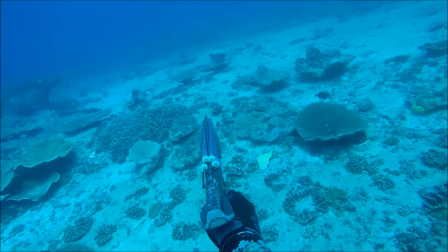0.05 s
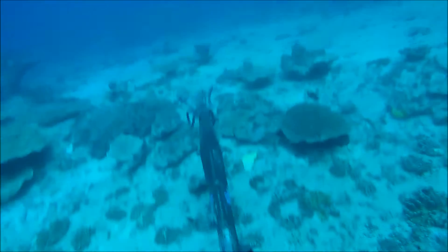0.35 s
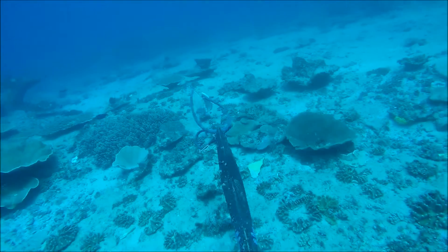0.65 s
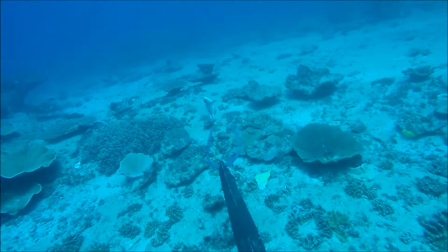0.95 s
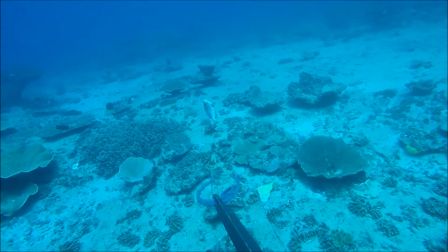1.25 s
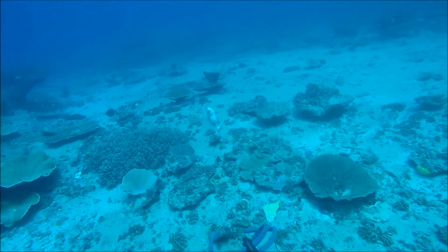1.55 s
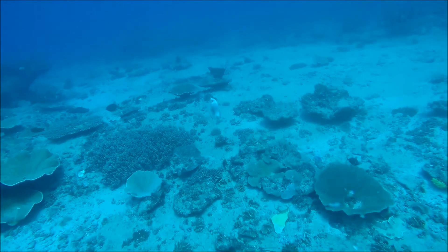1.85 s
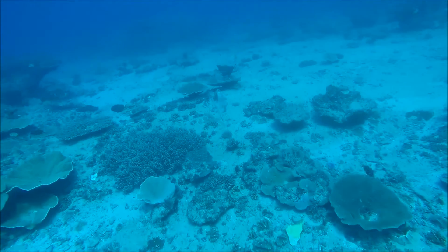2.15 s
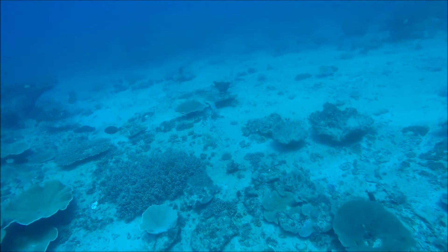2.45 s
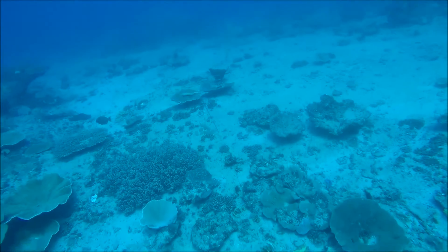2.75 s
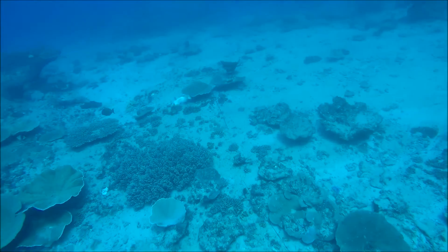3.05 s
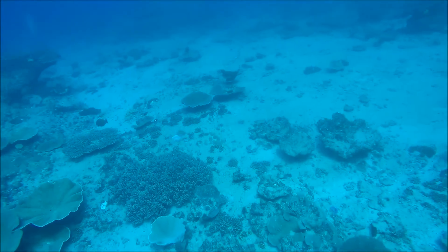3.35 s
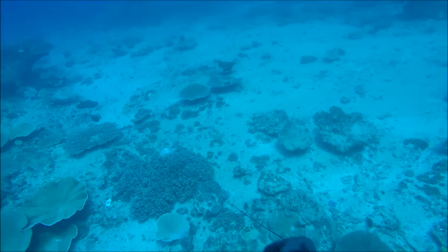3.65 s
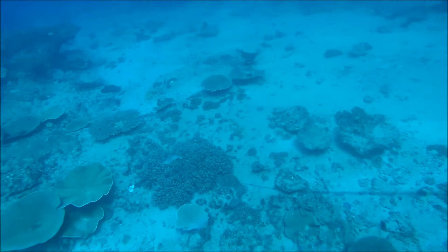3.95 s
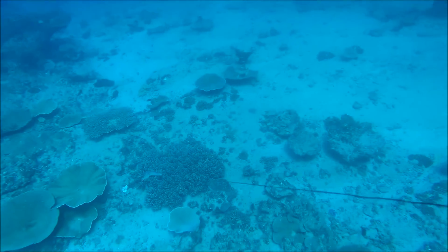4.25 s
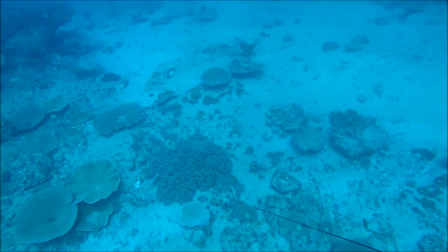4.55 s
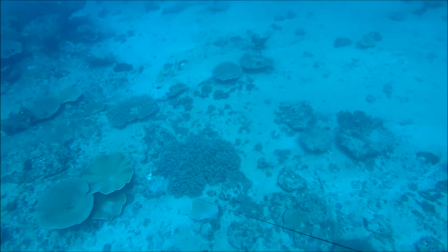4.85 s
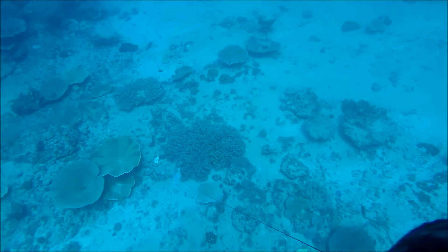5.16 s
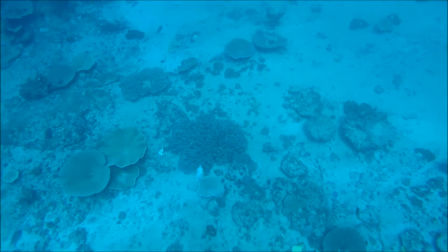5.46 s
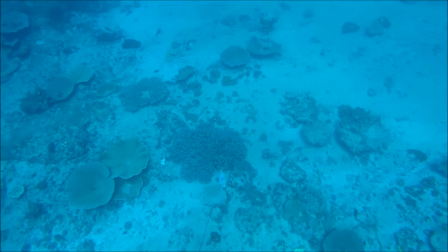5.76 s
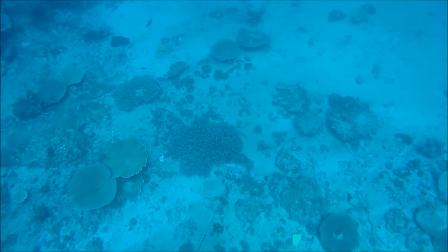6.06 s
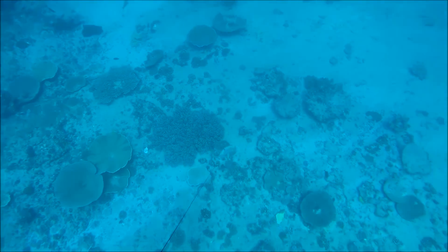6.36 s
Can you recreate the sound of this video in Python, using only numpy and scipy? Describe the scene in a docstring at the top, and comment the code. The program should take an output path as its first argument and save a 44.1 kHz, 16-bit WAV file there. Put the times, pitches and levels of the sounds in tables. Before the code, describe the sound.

A speargun snaps loudly underwater, followed by small clicks and knocks over a low current and a swell of bubbly fizz.

```python
"""Speargun over a coral reef.

Underwater, close to the gun, with the microphone inside a waterproof camera housing. The trigger lets
go, the shaft scrapes out along the barrel, the recoil shoves the water and the line snaps taut. Gear
ticks and knocks over crackling shrimp and a low current, until a fizzing rush of water swells up."""
import sys
import numpy as np
from scipy import signal
from scipy.fft import rfft, irfft
from scipy.io import wavfile
from scipy.ndimage import uniform_filter1d

SR = 44100
rng = np.random.default_rng(int(sys.argv[2]) if len(sys.argv) > 2 else 0)


def transcribe(signal):
    """Save signal, clipped to [-1, 1], as a 16-bit WAV file at the path in sys.argv[1]."""
    frames = np.atleast_2d(signal).T
    limited = np.clip(frames, -1, 1)
    pcm = np.round(limited * 32767).astype(np.int16)
    wavfile.write(sys.argv[1], SR, pcm)


N = 287091
T = np.arange(N) / SR
BRIEF = T[:SR // 2]


def undb(db):
    """Decibels to gain."""
    return 10 ** (np.asarray(db) / 20)


def unit(x):
    """Scale to rms 1."""
    return x / np.std(x)


def peak(x, db):
    """Scale to a peak level."""
    return x * undb(db) / np.max(np.abs(x))


def add(out, s, x):
    """Mix a short sound in at time s."""
    start = int(s * SR)
    out[start:start + len(x)] += x[:N - start]


def band(x, hz, kind, order=4):
    """Low-, high- or band-pass."""
    return signal.sosfilt(signal.butter(order, hz, kind, fs=SR, output="sos"), x)


def resonance(x, hz, width_hz):
    """One resonant peak."""
    return signal.lfilter(*signal.iirpeak(hz, hz / width_hz, SR), x)


def colour(x, points, size=4096):
    """Minimum-phase filter through (Hz, dB) points, falling away beyond both ends."""
    hz, db = np.transpose(sorted(points))
    octave = np.log2(np.maximum(np.arange(size // 2 + 1) * SR / size, 1))
    outside = np.abs(octave - np.clip(octave, np.log2(hz[0]), np.log2(hz[-1])))
    gain = undb(np.interp(octave, np.log2(hz), db) - 20 * outside)
    cepstrum = irfft(np.log(gain))
    cepstrum[1:size // 2] *= 2
    cepstrum[size // 2 + 1:] = 0
    return signal.fftconvolve(x, irfft(np.exp(rfft(cepstrum))))[:len(x)]


def walk(rate):
    """Smooth random drift with a spread of 1, turning `rate` times a second."""
    hold = int(SR / rate)
    steps = np.repeat(rng.standard_normal(N // hold + 1), hold)
    return unit(uniform_filter1d(steps, hold)[:N])


def grains(rate, spread_db):
    """Random clicks of unequal size, about `rate` a second."""
    size = undb(spread_db * np.minimum(rng.standard_normal(N), 2.5))
    return (rng.random(N) < rate / SR) * size * rng.choice([-1, 1], N)


def impulse(t, chatter, decay_s):
    """One sharp push with a dying tail of noise."""
    push = chatter * rng.standard_normal(len(t)) * np.exp(-t / decay_s)
    push[0] += 1
    return push


def swells(table, steady_db=-200):
    """Gain of smooth swells that rise out of a steady level and sink back."""
    power = sum((undb(db) * np.exp(-((T - s) / half_s) ** 2)) ** 2 for s, db, half_s in table)
    return np.sqrt(undb(steady_db) ** 2 + power)


def fade(s, db_per_s):
    """Gain that holds at 1 until time s, then dies away."""
    return undb(-db_per_s * np.maximum(T - s, 0))


def swings(table, rise_s):
    """Damped oscillations that take a moment to build."""
    out = np.zeros(N)
    for s, db, hz, t60 in table:
        envelope = (1 - np.exp(-(BRIEF / rise_s) ** 2)) * np.exp(-np.log(1000) * BRIEF / t60)
        add(out, s, peak(-np.sin(2 * np.pi * hz * BRIEF) * envelope, db))
    return out


def reef(level_db=-48):
    """Countless far shrimp merge into a hiss; nearer ones crackle."""
    # the reef heard through the housing: (frequency [Hz], gain [dB])
    reef_colour = [(1150, -24), (1900, -16), (2450, 0.5), (2780, 1.5), (3000, -13), (3250, -5.5),
                   (3950, -7.5), (4850, 0.5), (5500, -15), (6400, -16), (7250, -8.5), (8800, -20.5),
                   (10800, -18.5), (14000, -27.5)]
    far = undb(0.5) * unit(grains(rate=9000, spread_db=4.5))
    near = undb(-5) * unit(grains(rate=450, spread_db=8.5))
    return unit(colour(far + near, reef_colour)) * undb(level_db + 0.054 * walk(rate=5.5))


def current(start_db=-44.5, rise_db_per_s=0.79, waver_db=2):
    """Eddies and a current buffet the housing; the current grows slowly as the diver moves off."""
    # passing eddies: (time [s], level [dB], half length [s])
    eddies = [(.27, -35.5, 0.032), (.48, -39.5, 0.066), (.94, -38, 0.035), (2.29, -35, .1),
              (3.02, -33, .06), (3.18, -33, 0.096), (4.15, -43, 0.27), (4.65, -36.5, 0.13),
              (5.0, -37, 0.086)]
    # rumble of water on the housing: (frequency [Hz], gain [dB])
    flow_colour = [(18, 7), (32, 2), (55, -3.5), (80, -9.5), (110, -20), (170, -24), (260, -29.5),
                   (400, -48.5)]
    level = swells(eddies, start_db + rise_db_per_s * T) * undb(waver_db * walk(rate=10))
    return unit(colour(rng.standard_normal(N), flow_colour)) * level


def knock(db, hz):
    """A soft contact: a few cycles around one pitch, with no treble."""
    # dull body of a knock: (frequency [Hz], gain [dB])
    knock_colour = [(150, -16), (330, 3.5), (480, 0), (590, -3.5), (750, 0.5), (1050, -4), (1400, -26),
                    (2500, -11)]
    push = impulse(BRIEF, chatter=0.069, decay_s=0.0052)
    return peak(resonance(colour(push, knock_colour), hz, 0.43 * hz), db)


def knocks(gain_db=1, taps_per_s=5, tap_db=-44.5, tap_spread_db=2, tap_hz=382):
    """The gun and its rubber bands knock; the slack bands tap faintly at uneven gaps in between."""
    # distinct knocks: (time [s], peak before gain [dB], pitch [Hz])
    bumps = [(0.272, -14, 496), (.633, -41, 358), (.681, -43, 370), (1.505, -42.5, 355),
             (1.626, -43.5, 366), (1.763, -47, 463), (1.84, -41.5, 366), (2.197, -40.5, 364),
             (2.474, -42, 374), (2.516, -40, 1090), (2.596, -39.5, 850), (2.659, -36, 750),
             (2.683, -34, 865), (2.836, -43, 380), (2.927, -37.5, 503), (3.106, -43, 390), (3.23, -22, 750),
             (3.701, -43, 378), (4.045, -44, 412), (4.069, -39.5, 369), (4.086, -44, 387),
             (4.175, -41, 334), (4.336, -37, 396), (4.668, -35.5, 398), (4.862, -43, 436)]
    out = np.zeros(N)
    for s, db, hz in bumps:
        add(out, s + 0.00084, knock(db + gain_db, hz))
    for k, (delay, strength) in enumerate(rng.random((64, 2))):
        s = (k + delay) / taps_per_s
        if s < T[-1]:
            add(out, s, knock(tap_db + tap_spread_db * (2 * strength - 1), tap_hz))
    return out


def contact(ring_db, edge_db, decay_s, centre_hz, width_hz, chatter, split_hz=3600):
    """A blow rings the housing; its ring and its bright edge each have their own level."""
    # modes of the housing: (frequency [Hz], width [Hz], gain [dB])
    modes = [(1270, 960, -16), (1690, 420, -11.5), (2090, 120, -8.5), (2389, 154, -1), (2745, 90, 1),
             (3150, 210, -10), (4730, 330, -2), (5120, 750, -8.5), (7170, 360, -8.5), (8200, 440, -16),
             (9440, 230, -18.5), (12100, 640, -26.5)]
    push = impulse(BRIEF[:SR // 10], chatter, decay_s)
    ring = sum((-1) ** k * undb(db) * resonance(push, hz, width)
               for k, (hz, width, db) in enumerate(modes))
    body = resonance(band(ring, split_hz, "low"), centre_hz, width_hz)
    return peak(body, ring_db) + peak(band(ring, split_hz, "high"), edge_db)


def speargun(release_s=0.2767, rise_s=0.03, clear_s=0.3265, taut_s=0.432):
    """The shaft sticks and slips until it clears the muzzle; the line runs out and shivers once taut."""
    # blows of trigger, shaft on barrel and line snapping taut:
    # (time [s], ring [dB], bright edge [dB], contact decay [s], centre [Hz])
    blows = [(0.2713, -13, -15, 0.0012, 2670), (0.2741, 4.5, -1.5, 0.0017, 2740),
             (0.2761, -5.5, -24, 0.0038, 2160), (.2957, -10, -9, 0.0044, 2680),
             (0.3154, -30, 0, 0.00087, 2670), (0.3255, -18, -1, 0.0015, 2670),
             (.3358, -23, -10.5, 0.0012, 2300), (.3564, -15, -23, 0.003, 2020),
             (0.3774, -19, -33, 0.0053, 1650), (0.401, -28, -51, 0.0029, 1500),
             (0.4272, -20, -31, 0.0009, 2670), (0.4313, -5.5, -16, 0.0017, 2750),
             (.4376, -23, -18, 0.00055, 2670), (0.4574, -28, -31, 0.0015, 2350)]
    # rasp of shaft and line sliding: (frequency [Hz], gain [dB])
    slide_colour = [(180, -102), (300, -19), (968, -19.5), (1280, -13), (1620, -7), (2650, 4.5),
                    (3070, -13), (4000, -8), (4960, 3.5), (5950, -18), (7140, -7), (9450, -22),
                    (10600, -37), (12300, -27), (15500, -40)]
    speed = np.clip((T - release_s) / rise_s, 0, 1)
    shaft = undb(-19) * speed ** 1.8 * fade(clear_s, db_per_s=1700)
    line = undb(-33) * (T > clear_s) * fade(clear_s, db_per_s=260)
    shiver = undb(-40) * (T > taut_s) * fade(taut_s, db_per_s=130)
    rasp = unit(colour(grains(rate=14000, spread_db=7.5), slide_colour))
    edge = band(unit(colour(rng.standard_normal(N), slide_colour)), 8600, "high")
    out = rasp * (shaft + line + shiver)
    out += undb(8.5) * edge * shaft  # the fast shaft adds a bright edge
    for s, ring_db, edge_db, decay_s, hz in blows:
        add(out, s, contact(ring_db, edge_db, decay_s, hz, width_hz=1200, chatter=0.29))
    return out


def twangs():
    """Gun, shaft and taut line ring briefly after a tug."""
    # ringing tones: (time [s], peak [dB], pitch [Hz], t60 [s])
    tones = [(.273, -10, 1296, 0.0076), (.273, -22, 700, 0.014), (.3245, -7.5, 5240, 0.0087),
             (.335, -26, 345, 0.035), (3.232, -39, 805, 0.08), (3.410, -27.5, 367, 0.046),
             (3.420, -45.5, 2020, 0.098), (4.668, -31.5, 339, 0.052), (4.670, -36, 1966, 0.056)]
    return swings(tones, rise_s=0.0048)


def shoves():
    """Water shoved against the housing thumps, hardest at the recoil."""
    # low thumps: (time [s], peak [dB], pitch [Hz], t60 [s])
    thumps = [(.2765, -4, 54.3, 0.13), (.326, -10, 31.5, 0.14), (.380, -13.5, 28.3, 0.24),
              (.9435, -21.5, 130, 0.015), (1.452, -37, 147, 0.023), (2.295, -30.5, 56.6, 0.43),
              (2.659, -29.5, 80, .031), (2.975, -26, 65.3, 0.038), (3.232, -29.5, 141, .12),
              (4.190, -32.5, 186, 0.024), (4.295, -26.5, 40.4, 0.14), (4.845, -23, 45.7, 0.11)]
    return swings(thumps, rise_s=0.0023)


def rubs():
    """The line slips over the gun in gritty strokes that catch at once and ease off."""
    # strokes of the line: (time [s], level [dB], length [s], centre [Hz])
    strokes = [(0.294, -45, 0.18, 200), (2.691, -49.5, 0.1, 2000), (2.798, -48.5, 0.065, 1850),
               (2.879, -42, .09, 2780), (2.963, -43, 0.088, 2450), (3.231, -52, 0.085, 785),
               (3.234, -48, 0.069, 272), (3.398, -51.5, 0.055, 930), (4.05, -58.5, 0.32, 1490),
               (4.19, -50, .12, 2090), (4.24, -55, 0.059, 340), (4.341, -48.5, 0.023, 1490),
               (4.412, -44.5, 0.082, 1770), (4.861, -50.5, 0.03, 1130), (5.009, -36.5, 0.0076, 3430)]
    # friction of line on gun: (frequency [Hz], gain [dB])
    rub_colour = [(200, -6), (380, -2), (560, 3.5), (800, 0.5), (1200, -1.5), (1650, -3), (1900, -6.5),
                  (2350, 5), (2750, 5), (3100, -4), (4700, 6), (5800, -24.5)]
    out = np.zeros(N)
    grit = colour(grains(rate=2700, spread_db=4.5), rub_colour) * undb(3.2 * walk(rate=120))
    for s, db, length, hz in strokes:
        stroke = grit[int(s * SR):int((s + length) * SR)]
        stroke = resonance(resonance(stroke, hz, 0.63 * hz), hz, 2 * hz)
        progress = np.linspace(0, 1, len(stroke))
        envelope = np.minimum(20 * progress, 1) * np.sqrt(1 - progress)
        add(out, s, unit(stroke * envelope) * undb(db))
    return out


def shuffle():
    """Gear shifts with a faint, dull patter, louder while it is handled."""
    # bouts of handling: (time [s], level [dB], half length [s])
    handling = [(.5, -55.5, 0.029), (2.5, -59, 0.29), (3.15, -58.5, 0.36), (4.3, -58, 0.25),
                (5.25, -67, 0.31)]
    # patter of the gear: (frequency [Hz], gain [dB])
    patter_colour = [(220, -14.5), (360, 0), (480, -11.5), (620, -13.5), (800, -6), (1000, -18), (1500, -2)]
    patter = unit(colour(grains(rate=170, spread_db=1), patter_colour))
    return patter * swells(handling, steady_db=-66)


def ticks(ring_gain_db=-2, edge_gain_db=-16):
    """Light contacts close by; the soft line excites the housing's lower modes most."""
    # touches of line and gear: (time [s], peak before gain [dB], centre [Hz])
    touches = [(.495, -26, 2530), (0.506, -28, 2400), (0.521, -28.5, 2300), (0.6173, -27, 2050),
               (.63, -27, 2250), (0.7609, -33.5, 2880), (1.005, -34, 2060), (1.118, -33, 2150),
               (2.3257, -29, 1750), (2.5148, -26, 1870), (3.8292, -20, 2030), (4.3854, -26.5, 1840),
               (4.4202, -21.5, 1740), (4.4447, -37, 1900), (4.5226, -22.5, 1910), (4.999, -28, 2270),
               (5.009, -32, 1920), (5.076, -29.5, 1970), (5.1786, -28, 1630)]
    out = np.zeros(N)
    for s, db, hz in touches:
        tick = contact(db + ring_gain_db, db + edge_gain_db, decay_s=0.0015,
                       centre_hz=hz, width_hz=640, chatter=0.46)
        add(out, s + 0.00099, tick)
    return out


def shrimp_snaps(treble_gain_db=9, split_hz=9500):
    """A shrimp's collapsing bubble gives one very short crack; the treble has its own level."""
    # shrimp near the microphone: (time [s], peak below split [dB], peak above split before gain [dB])
    snaps = [(1.6616, -29.5, -63), (2.398, -23.5, -55), (3.0463, -42, -42.5), (3.245, -29, -61),
             (3.784, -46, -42), (3.8304, -25.5, -44), (4.14, -29.5, -71), (4.3462, -27.5, -59),
             (4.854, -29, -44), (6.2942, -24.5, -50), (6.3202, -32, -39)]
    # crack of the bubble: (frequency [Hz], gain [dB])
    snap_colour = [(2500, -18), (4900, 7), (6000, -14), (7300, -1.5), (9000, -18), (13000, -18),
                   (15500, -29)]
    out = np.zeros(N)
    for s, db, treble_db in snaps:
        crack = colour(impulse(BRIEF[:SR // 50], chatter=0.16, decay_s=0.0014), snap_colour)
        add(out, s, peak(band(crack, split_hz, "low"), db))
        add(out, s, peak(band(crack, split_hz, "high"), treble_db + treble_gain_db))
    return out


def rush(full_s=5.57, rise_db_per_s=81, fizz_lag_s=0.054, gurgle_hz=400, whistle_hz=3820):
    """Stirred water churns and gurgles as fine bubbles fizz; a surge brings larger bubbles of one size."""
    # churning water and fine bubbles: (frequency [Hz], gain [dB])
    churn_colour = [(76, -26), (130, -7.5), (187, 2.5), (225, -12), (321, -11), (427, -27.5), (595, -15.5),
                    (858, -13), (1040, -17.5), (1400, -9.5), (1800, -20.5), (2000, -14), (2600, -53),
                    (4400, -120)]
    fizz_colour = [(1700, -32), (2200, 4), (2700, 4), (3050, -4), (4000, -4.5), (4900, -9.5), (5600, -25)]
    # surges of water and of larger bubbles: (time [s], level [dB], half length [s])
    churn_surge = [(5.87, -40.5, 0.16)]
    bubble_surge = [(5.73, -37, 0.13)]
    build = lambda until_s: undb(rise_db_per_s * np.minimum(T - until_s, 0))
    water = unit(colour(grains(rate=5000, spread_db=2.5), churn_colour))
    gurgle = band(water, gurgle_hz, "low") * undb(2.5 * walk(rate=22))
    churn = gurgle + band(water, gurgle_hz, "high")
    churn *= swells(churn_surge, steady_db=-46) * build(full_s)
    fizz = unit(colour(grains(rate=6700, spread_db=-4), fizz_colour))
    fizz *= undb(-43.5) * build(full_s + fizz_lag_s)
    bubbles = resonance(grains(rate=1400, spread_db=-1), hz=2610, width_hz=310)
    bubbles = unit(band(bubbles, [2250, 3000], "band", order=2)) * swells(bubble_surge)
    whistle = resonance(rng.standard_normal(N), whistle_hz, width_hz=99)
    whistle = unit(resonance(whistle, whistle_hz, width_hz=300))
    whistle *= swells([(6.33, -49.5, 0.22)])  # faint and hissy, late in the fizz
    flutter = undb(1.2 * walk(rate=50))
    return (churn + fizz + bubbles + whistle) * flutter


def scene():
    """Gear close by, water all around and the reef beyond reach one microphone inside the housing."""
    gear = speargun() + ticks() + knocks() + rubs() + shuffle() + twangs()
    water = current() + rush() + shoves()
    return (gear + water + reef() + shrimp_snaps())[None]


def record(dry):
    """The shot overloads the input; the top is cut above 15.6 kHz."""
    low_pass = signal.ellip(8, 0.2, 70, 15600, fs=SR, output="sos")
    return signal.sosfilt(low_pass, np.clip(dry, -1, 1))


dry = scene()
out = record(dry)
transcribe(out)
```